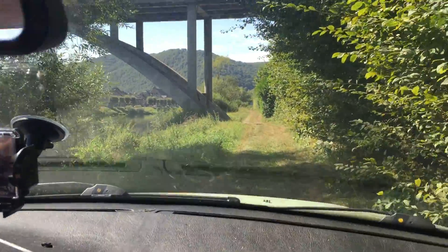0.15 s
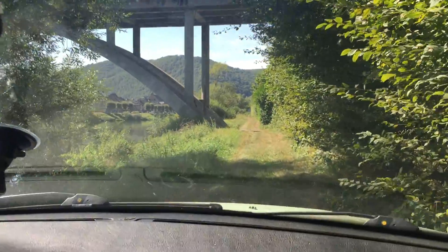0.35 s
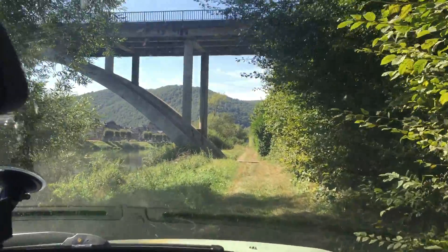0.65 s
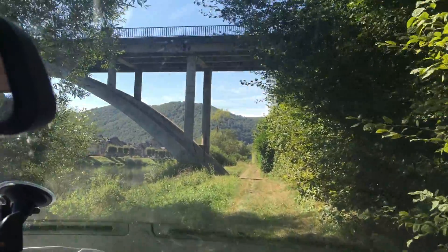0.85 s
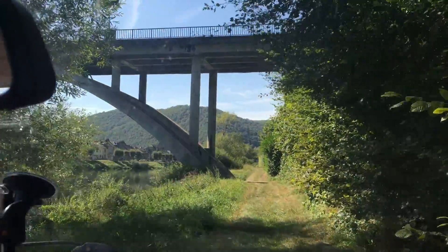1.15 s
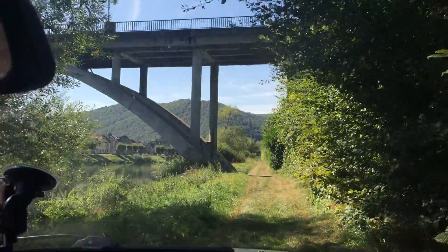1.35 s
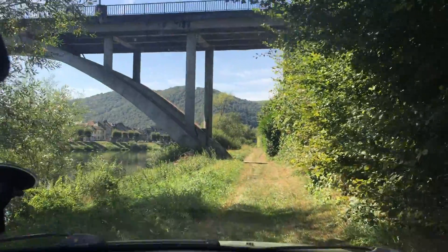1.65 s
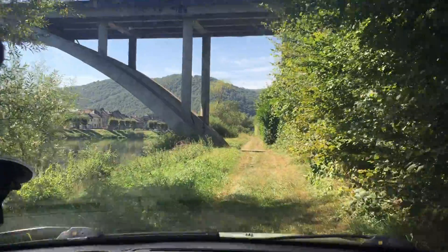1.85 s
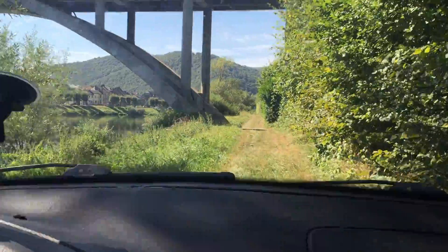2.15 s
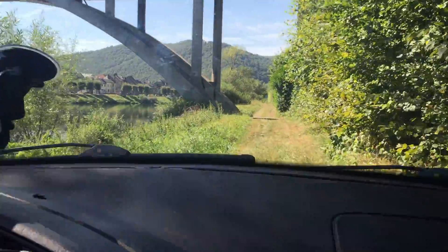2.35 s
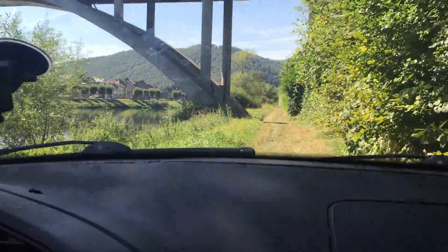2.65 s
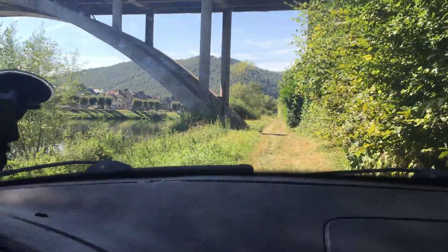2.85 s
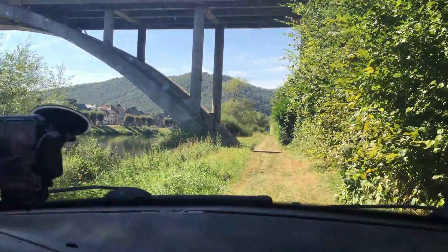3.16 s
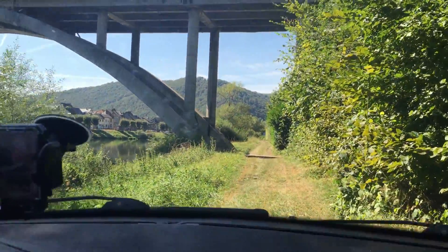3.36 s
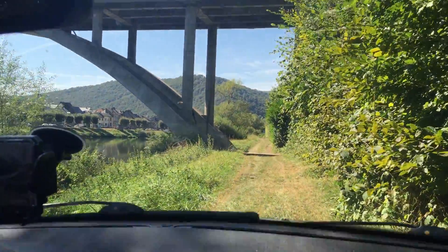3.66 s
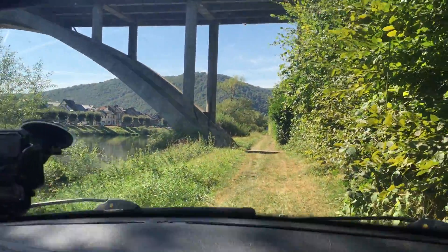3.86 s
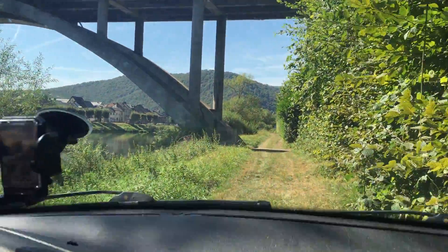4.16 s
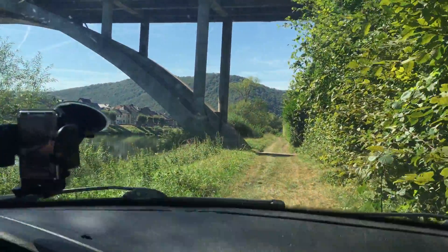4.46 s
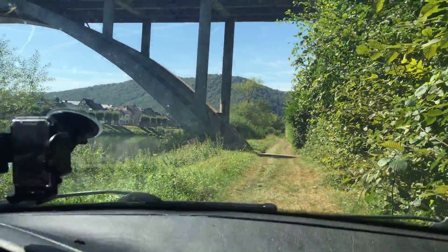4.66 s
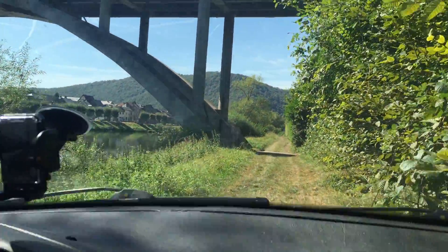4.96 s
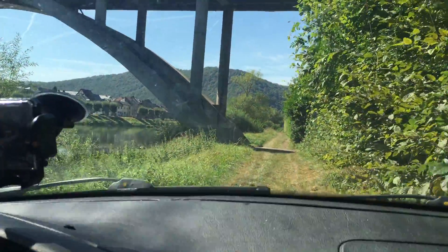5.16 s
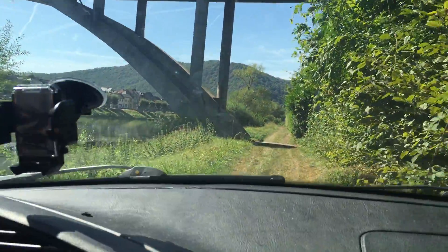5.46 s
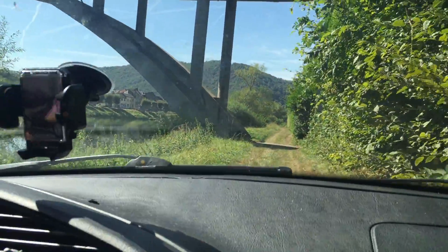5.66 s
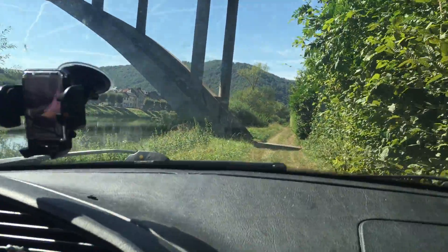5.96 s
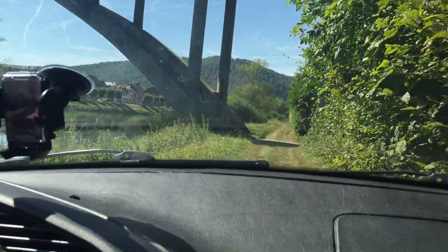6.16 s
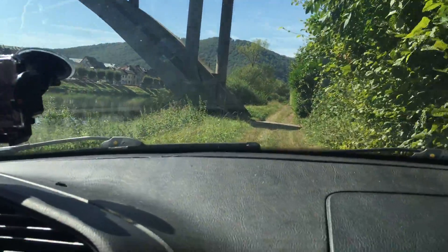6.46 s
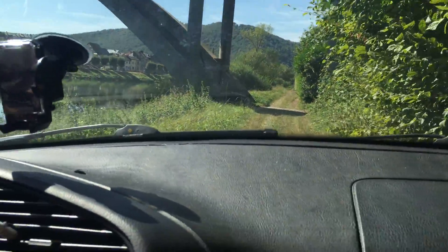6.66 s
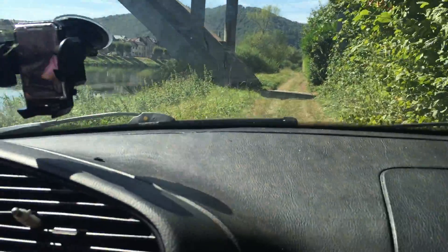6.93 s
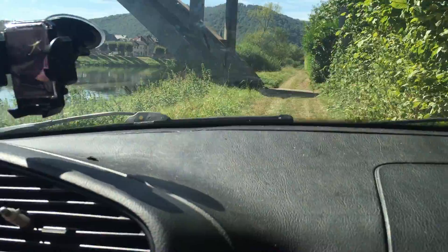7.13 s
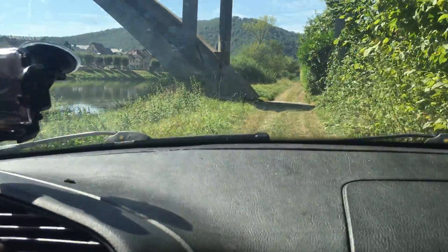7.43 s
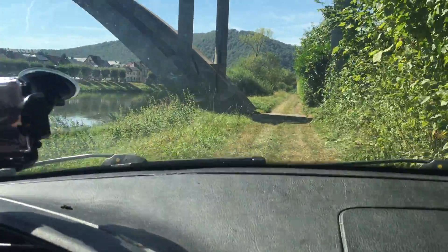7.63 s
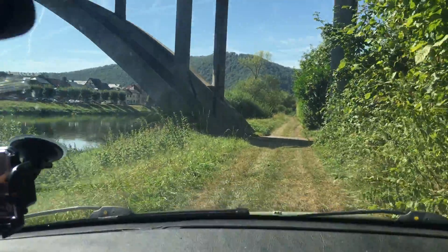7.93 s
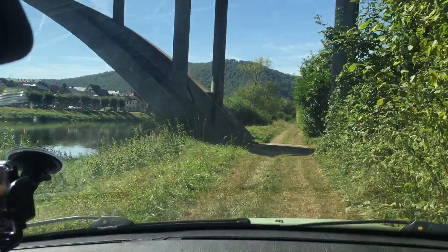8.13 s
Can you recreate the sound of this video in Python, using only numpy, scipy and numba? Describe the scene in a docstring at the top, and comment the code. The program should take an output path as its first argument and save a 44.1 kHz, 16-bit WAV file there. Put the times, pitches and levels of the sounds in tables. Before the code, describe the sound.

A phone in a car cabin picks up a steady low engine drone, rumbling tyres and soft bassy thuds from ruts. Early twig taps are faint; a short patch of brushing and knocks comes after three seconds. From five to seven and a half seconds the hedge drags heavily along the door, leaves hissing, twigs snapping and knocking, a stem squeaking. It ends with quieter rumble, one more thump and a faint cricket outside.

```python
"""First heard is engine hum over low road rumble, with a knock on the door and a rut thumping the air.
A phone held in the cabin of a small car hears it crawl along a rutted grass track beside a hedge.
Engine orders are sines, the road is shaped noise, and ruts ring the cabin modes. On the door panel and
glass, noise through resonances makes leaves brush, twigs scrape and knock, and a stem squeal.
A cricket chirps now and then through the open window: noise pulsed by wing strokes."""
import sys
import numpy as np
from scipy import signal
from scipy.fft import rfft, irfft, next_fast_len
from scipy.io import wavfile
from scipy.ndimage import uniform_filter1d
from numba import njit

SR = 44100
rng = np.random.default_rng(int(sys.argv[2]) if len(sys.argv) > 2 else 0)


def transcribe(u):
    """Save the signal u as a 16-bit wav file named by the first command-line argument.

    u: samples, shape (n,) or (channels, n), limited to [-1, 1]; the rate is SR.
    q: integer samples, one column per channel.
    """
    v = np.clip(np.atleast_2d(u).T, -1, 1)
    q = np.round(v * 32767).astype(np.int16)
    wavfile.write(sys.argv[1], SR, q)


N = 365588
T = np.arange(N) / SR  # s

# Outside, through the open window: cricket chirps. start_s, peak_db, length_ms
CRICKET_CHIRPS = [(1.38, -60, 30), (2.824, -58.5, 68), (2.904, -57, 77), (2.982, -52, 55),
                  (8.129, -59, 15.4), (8.157, -65, 14), (8.198, -50, 22), (8.243, -56, 31)]
CRICKET_HZ, CRICKET_STROKES_HZ = 5700, 73.5

# Under the floor: relative spectrum of the road rumble. frequency_hz, density_db (per Hz)
ROAD_SPECTRUM = [(22, -22), (32, -7), (50, 2), (68, -1), (95, -5), (130, -2), (180, -7.5), (250, -12),
                 (400, -17), (520, -25.5), (750, -25), (1100, -33.5), (1700, -32.5), (2400, -47.5),
                 (4500, -58), (15000, -57.5)]
ROAD_DB, RATTLE_DB = -40, -64.5  # rumble; door trim shaken by the road

# Engine through its run. time_s, firing_rate_hz, first_order_db, higher_order_load_db
ENGINE_CURVE = [(0.0, 47.4, -34.5, -1.5), (0.3, 45.72, -39.5, -1.5), (0.5, 48.27, -70, 1),
                (0.78, 48.07, -36, 2.5), (1.05, 50.25, -32.5, 5.5), (1.3, 51.7, -28.5, 3.5),
                (1.55, 51.63, -30.5, 2), (1.7, 51.85, -31.5, 2), (2.0, 52.97, -25, 3),
                (2.2, 52.58, -26, -7), (2.36, 51.4, -27.5, -2), (2.43, 51.6, -33, -14),
                (2.5, 50.33, -29, -16), (2.58, 49.3, -35, -15), (2.68, 47.9, -33, -14),
                (2.85, 44.9, -36, -14), (3.05, 43.4, -41.5, -17), (3.25, 43.1, -36.5, -4.5),
                (3.5, 40.76, -34, 2), (3.75, 42.5, -38.5, -1.5), (3.95, 44, -38, 0), (4.2, 44.89, -44, 2),
                (4.35, 44.46, -40, -2.5), (4.6, 44.63, -38, 1.5), (4.87, 44.78, -40.5, -3),
                (5.0, 45.57, -44, -1), (5.8, 46.12, -43, 1.5), (6.3, 46.8, -38, 1.5),
                (6.7, 46.26, -44, -0.5), (7.05, 44.97, -41, 0.5), (7.35, 45.1, -45, -0.5),
                (7.6, 45.64, -46, 0), (8.29, 45.29, -39, -2.5)]
# Higher orders; 4.2, 6.3 and 8.4 come from a shaft geared to the crank. turns_per_firing, level_db
ORDER_LEVELS = [(2, -2), (3, -1.46), (4, -7), (4.2, -7), (5, -9.5), (6.001, -12), (6.3, -9), (8.4, -9)]
# Floor and seats boom where an order crosses one of these. frequency_hz, half_width_hz, level_db
BODY_BOOMS = [(84.9, 3.6, -41), (91, 5.1, -50), (104.34, 2.5, -45.5), (124.3, 6.2, -43), (140.3, 6.4, -40),
              (157.5, 3.1, -51), (178.75, 1.9, -35.5), (195.3, 3.1, -48), (217.9, 3.64, -42),
              (230, 3.4, -56.5), (282.6, 5.3, -53), (306.4, 17, -49.5), (348, 14.6, -47.5),
              (392.5, 11.4, -55.5)]
WOBBLE_DB = 0.35  # level flutter, multiplied by the order number

# Air and floor modes of the cabin. frequency_hz, level_db, t60_s
CABIN_MODES = [(55.2, 3.5, 0.5), (68, -1, 0.15), (144, 7.5, 0.22), (175.6, 2.5, 0.64)]
# Wheels dropping into ruts. start_s, peak_db, push_length_ms
RUT_DROPS = [(0.064, -21.5, 11.4), (0.498, -20, 11.7), (2.471, -31, 6.5), (2.618, -20, 19),
             (2.926, -21.5, 2.2), (3.36, -22.5, 7.7), (4.329, -23.5, 8.7), (5.037, -25.5, 9.4),
             (6.299, -58, 8.3), (7.3, -28, 8.1), (7.625, -22, 8.2), (7.752, -25.5, 9.7), (7.881, -26, 6.6),
             (8.138, -26, 6.3)]

# On the glass: leaf tips flicking it. start_s, peak_db
LEAF_TICKS = [(0.44, -45), (0.7477, -45), (0.9144, -57), (1.022, -50), (3.1532, -44.5), (3.33, -41),
              (3.395, -42), (3.495, -49), (3.608, -45), (3.65, -46), (3.72, -50), (3.809, -44), (3.96, -49),
              (4.08, -54), (4.1725, -41), (4.9023, -49), (5.212, -31), (5.39, -31), (5.483, -32),
              (5.572, -34), (6.0397, -34), (6.144, -25.5)]
TICK_MS = 11  # decay time constant
# On the glass: a stem skids. time_s, level_db, pitch_hz
STEM_SQUEAL = [(7.05, -57, 6520), (7.106, -46.5, 6700), (7.21, -43.5, 5840), (7.226, -38.5, 6083),
               (7.306, -35.5, 6220), (7.342, -51, 5930), (7.42, -57, 5900)]

# Modes of the door skin. frequency_hz, width_hz, level_db
DOOR_MODES = [(691, 85, -0.5), (1038, 51, 5), (1385, 160, -7.5), (1528, 77, 3), (1826, 146, -2.5),
              (1920, 620, -6.5), (3080, 330, -11), (3486, 210, -9), (4350, 500, -20), (5340, 130, -20),
              (6620, 600, -10)]
FLEX = 0.02  # share by which the modes move for a shift of 1
# Twigs knocking the door. start_s, peak_db, ring_pitch_hz,
# dull_thud_db (against the whole blow), wide_crack_db (against the ring), contact_ms
TWIG_KNOCKS = [(0.048, -39, 1120, 1, -18, 10), (0.259, -44, 880, 3, 10, 14),
               (0.515, -44.5, 700, -15, -12, 31), (1.007, -44, 945, -12, -21, 21),
               (2.276, -49, 2324, 3, 10, 18.3), (2.388, -48, 1510, -5, -12, 11.7),
               (2.42, -44, 1210, -14, -9, 9.2), (2.434, -32, 1170, -8, -16, 8),
               (2.857, -47, 600, 8, -17, 12), (2.904, -45, 3500, -1, 7, 17),
               (3.018, -27.5, 1570, -29, 12, 5.7), (3.052, -44.5, 1183, 3.5, 4, 15),
               (3.538, -28.5, 1420, -5, 12, 13.9), (3.568, -37, 3266, -10, 3, 6.6),
               (3.58, -29, 3080, -5, -21, 7.6), (3.599, -39, 1580, 2, -3, 9.2),
               (3.618, -40.5, 2845, -3, 5, 7.9), (3.639, -43, 2560, -12, 2, 14),
               (3.688, -41.5, 1100, -17, 1, 17), (3.758, -39.5, 1488, 0, -20, 9.9),
               (3.946, -40, 1530, -22, -15, 13), (4.003, -47, 1592, -22, -1, 11.6),
               (4.168, -39.5, 2940, -4, 2, 13.5), (4.478, -54, 4730, -6, -5, 8.6),
               (4.575, -46, 946, -6, -19, 8), (4.848, -46, 1550, -11, -11, 16.6),
               (4.902, -39, 700, -11, -2.5, 13), (4.922, -37.5, 690, -0.5, -13, 15),
               (5.071, -36, 750, -26, -2, 7.3), (5.088, -36, 710.6, -20, -10, 9.9),
               (5.107, -35.5, 2462, -3, -10, 7), (5.162, -44, 2933, -4, 3, 7),
               (5.247, -41, 719, -20, -6, 12), (5.302, -43, 2202, -23, 2, 10),
               (5.318, -35, 5190, -20, -3, 3.95), (5.322, -42, 720, -20, -7, 8.1),
               (5.446, -35, 2178, -26, 0, 10.4), (5.499, -30, 2680, -24, 2, 8.5),
               (5.521, -36, 2302, -20, 1, 9), (5.539, -35, 2775, -15, -1, 8),
               (5.557, -25, 1310, -7, 12, 9.6), (5.57, -19, 3430, -30, -20, 4.3),
               (5.6, -29, 2980, -20, 1, 11), (5.631, -28, 1882, -3.5, 0, 10.7),
               (5.664, -38, 2200, -15, 7, 5.7), (5.702, -42, 1416, -12, 4, 9.5),
               (5.758, -28.5, 3040, -3, -2, 12), (5.842, -27, 1888, -11, 9, 8.4),
               (5.871, -32, 1714, -2, 7, 9.3), (5.89, -28.5, 1720, -15, 9, 11),
               (5.968, -34, 2450, -21, 2, 8.3), (6.065, -22.5, 2766, -14, 0, 6.9),
               (6.072, -29.5, 915, -21, -6, 8.5), (6.091, -29, 2330, -16, -5, 14),
               (6.127, -22, 1620, -32, 9, 8.8), (6.132, -24.5, 670, -28, -13, 6.7),
               (6.142, -24, 3280, -14, -3, 10.5), (6.16, -34, 4300, -7, -2, 5.3),
               (6.338, -30, 1220, -3.5, -19, 7.1), (6.423, -35, 2070, -7, 8, 11),
               (6.452, -40, 595, 4, -7, 5.3), (6.806, -23, 1720, -8, 19, 10.8),
               (6.815, -23, 2956, -5, -3, 6.7), (6.831, -36.5, 715, 5, -12, 12),
               (6.88, -30.5, 2595, -9, 9, 6), (7.011, -15.5, 1880, -17, 4, 5.8),
               (7.014, -24, 3120, -5.5, -10, 5.2), (7.055, -35.5, 2290, -2, 6, 8),
               (7.323, -35.5, 1955, -20, 0, 6.3), (7.619, -41, 1969, -20, -25, 10.3),
               (7.753, -43, 749, -13, -18, 37), (7.78, -50, 1704, -20, -19, 14),
               (7.871, -46.5, 1242, -22, -20, 18), (7.94, -40, 1560, 4, -23, 9.8),
               (8.142, -50, 1738, -19, -15, 19), (8.187, -44, 1640, 5.5, -25, 15)]
FIRST_STRIKE = 2.4  # size of the first contact against the chatter after it

# How hard the hedge presses on the door. time_s, leaf_brushing_db, twig_dragging_db, twig_pitch_hz
HEDGE_PRESSURE = [(0.0, -69, -65.5, 1760), (1.2, -72, -65, 1770), (1.9, -67.5, -64, 2200),
                  (2.2, -81, -66.5, 2200), (2.75, -79, -74, 2100), (3.12, -69, -62, 2320),
                  (3.25, -57.5, -67, 3060), (3.42, -57, -65, 3044), (3.7, -57.5, -58, 2980),
                  (3.8, -65, -64, 3234), (3.87, -59, -60, 4300), (4.0, -58, -59, 4220),
                  (4.06, -63, -58, 2560), (4.3, -67, -68, 2190), (4.9, -68, -68.5, 2220),
                  (4.98, -54, -53.5, 2960), (5.22, -41.5, -48, 2900), (5.52, -39, -45, 2800),
                  (5.68, -48.5, -51, 2690), (5.94, -47, -55, 2620), (6.45, -43.5, -48.5, 3060),
                  (6.63, -54.5, -66, 3180), (6.76, -50.5, -54.5, 2783), (6.84, -44.5, -49, 2880),
                  (7.3, -44.5, -56.5, 3730), (7.38, -50, -61, 3050), (7.72, -52.5, -65, 2620),
                  (7.83, -65.5, -80, 2080), (8.29, -73, -64.5, 1970)]
# Relative spectrum of the leaf hiss. frequency_hz, density_db (per Hz)
LEAF_SPECTRUM = [(1180, -3.5), (2000, -7.5), (2140, -6), (2690, -7), (3460, -9.5), (4340, -4.5),
                 (5100, -7.5), (6360, -2.5), (8050, -7.5), (9250, -4), (10500, -8.5), (12500, -5.5),
                 (14200, -8.5), (15700, -12)]
# Single sprigs swiping past. start_s, held_ms, leaves_db, twigs_db
SPRIG_SWIPES = [(0.43, 39, -58.5, -70), (0.665, 33, -64, -83), (0.74, 18, -72, -68), (0.905, 39, -61, -63),
                (1.015, 31, -63, -80), (1.38, 26, -69, -75), (1.70, 44, -65, -65), (1.85, 42, -64, -68),
                (3.009, 7.9, -50.5, -71), (3.15, 18, -71, -74), (3.27, 26, -66, -53.5),
                (3.301, 63, -52, -55), (3.46, 37, -58, -58), (3.54, 62, -62, -46), (3.80, 51.4, -50, -59),
                (3.87, 97, -54, -57), (4.03, 28, -57, -53), (4.163, 26.4, -54, -54),
                (4.388, 77, -64.5, -82), (4.95, 120, -49, -67), (5.059, 19, -42, -55), (5.20, 52, -53, -67),
                (5.555, 27, -34.5, -38.5), (5.76, 43, -45, -47), (5.839, 34, -48, -42),
                (5.965, 57, -42.5, -69), (6.035, 60.5, -36.5, -42), (6.124, 74, -37.5, -43.5),
                (6.80, 21, -44, -50), (6.90, 27, -48, -65), (7.005, 5.7, -39, -47), (7.22, 84, -55, -71),
                (7.88, 98, -68, -66), (8.01, 17, -64, -64), (8.09, 13.6, -69, -80)]
SWIPE_ATTACK_S, SWIPE_RELEASE_S = 0.012, 0.019
HARD_DULL_DB = 0.11  # fall of the leaf treble for each dB of harder contact
LEAF_RING_CYCLES = 4

# At the phone: microphone noise ahead of its filters, and the top of its range
HISS_DB, TOP_HZ = -80, 15770


def undb(db):
    """Amplitude factor of a level in dB."""
    return 10 ** (np.asarray(db) / 20)


def unit(x):
    """Signal scaled to an RMS of 1."""
    return x / np.sqrt(np.mean(x ** 2))


def curves(table):
    """Columns of a table joined by straight lines in time."""
    s, *columns = np.transpose(table)
    return [np.interp(T, s, column) for column in columns]


@njit
def svf(x, hz, width):
    """State-variable band-pass with a moving centre, gain 1 there."""
    y, b, l = np.empty(len(x)), 0., 0.
    for i in range(len(x)):
        g, k = np.tan(np.pi * hz[i] / SR), width / hz[i]
        v = (b + g * (x[i] - l)) / (1 + g * (g + k))
        b, l, y[i] = 2 * v - b, l + 2 * g * v, k * v
    return y


def band(x, hz, width):
    """One resonance at a fixed or moving centre, width in Hz."""
    return svf(x, hz + np.zeros(len(x)), float(width))


def walk(rate):
    """Random values held 1 / rate s and slewed twice, with an RMS of 1."""
    k = int(SR / rate)
    steps = np.repeat(rng.standard_normal(N // k + 1), k)
    smooth = uniform_filter1d(uniform_filter1d(steps, k), k)
    return unit(smooth[:N])


def crest(x, ms):
    """Usual peak of a noisy burst whose energy fills ms."""
    return np.sqrt(5 * np.sum(x ** 2) / (max(ms, 1) * SR / 1000))


def add(track, s, piece):
    """Lay a piece into the track from s seconds on."""
    i = int(s * SR)
    track[i:i + len(piece)] += piece[:N - i]


def grains(spread_db, rate):
    """Envelope of tiny contacts of very uneven size."""
    k = int(SR / rate)
    level_db = spread_db * rng.exponential(size=N // k + 1)
    size = np.repeat(undb(level_db), k)[:N]
    return unit(uniform_filter1d(size, k))


def patchy(spectrum, drift_db, drift_rate, grain_db, grain_rate):
    """Noise with a given spectrum; each half octave drifts and crackles on its own."""
    hz, db = np.transpose(spectrum)
    size = next_fast_len(N)
    octave = np.log2(np.arange(size // 2 + 1) * SR / size + 1)
    noise = rfft(rng.standard_normal(size)) * undb(np.interp(octave, np.log2(hz), db))
    out = 0
    for centre in np.arange(np.log2(hz[0]), np.log2(hz[-1]) + .5, .5):
        share = np.clip(1 - 2 * np.abs(octave - centre), 0, 1)
        part = irfft(noise * share, size)[:N]
        drift = undb(drift_db * walk(drift_rate))
        # a grain lasts at least a few cycles
        out = out + part * drift * grains(grain_db, min(grain_rate, 2 ** centre / 4))
    return unit(out)


def crackle(count, low_hz, high_hz, cycles, spread_db):
    """Small dry snaps, each ringing a few cycles at a pitch of its own."""
    out = np.zeros(N)
    for when, pitch, size in rng.random((count, 3)):
        hz = low_hz * (high_hz / low_hz) ** pitch
        t = T[:int(4 * cycles / hz * SR)]
        strength = undb(-spread_db * np.log(1 - .97 * size))
        snap = np.sin(2 * np.pi * hz * t) * np.exp(-t * hz / cycles)
        add(out, when * N / SR, strength * snap)
    return unit(out)


def panel(x, shift):
    """The door skin rings in its modes, which shift a little as it flexes."""
    out = 0
    for k, (hz, width, db) in enumerate(DOOR_MODES):
        out = out + (-1) ** k * undb(db) * band(x, hz * (1 + FLEX * shift), width)
    return out


def cricket():
    """Wing strokes, as pulses of noise, ring a short high resonance."""
    out, t = np.zeros(N), T[:SR // 8]
    for s, db, ms in CRICKET_CHIRPS:
        noise = rng.standard_normal(len(t))
        fade = np.clip((ms / 1000 - t) / 0.01, 0, 1)
        strokes = (1.9 + np.cos(np.pi * CRICKET_STROKES_HZ * t) ** 4) * fade
        note = band(band(noise * strokes, CRICKET_HZ, 420), CRICKET_HZ, 420)
        add(out, s, undb(db) * note / np.abs(note).max())
    return out


def road():
    """Tyres and suspension rumble over grass and gravel and shake the door trim."""
    rumble = patchy(ROAD_SPECTRUM, drift_db=1.1, drift_rate=4, grain_db=1.4, grain_rate=90)
    shake = band(grains(1.6, 120) * rng.standard_normal(N), 1000, 1100)
    rattle = undb(2.5 * walk(6)) * unit(panel(shake, walk(4)))
    return undb(ROAD_DB) * rumble + undb(RATTLE_DB) * rattle


def body(hz):
    """Gain of the floor and seats at a frequency: a sum of resonance peaks."""
    return sum(undb(db) / (1 + ((hz - centre) / width) ** 2) for centre, width, db in BODY_BOOMS)


def engine():
    """The first order has its own level; higher orders follow load and swell at body resonances."""
    hz, first_db, load_db = curves(ENGINE_CURVE)
    turn = 2 * np.pi * np.cumsum(hz * (1 + 0.0012 * walk(8))) / SR
    lines = [(1, undb(first_db))]
    for order, db in ORDER_LEVELS:
        lines.append((order, undb(db + load_db) * body(order * hz)))
    out = np.zeros(N)
    for order, size in lines:
        flutter = undb(WOBBLE_DB * order * walk(6))
        tone = np.sin(order * turn + rng.uniform(0, 2 * np.pi))
        out += np.sqrt(2) * size * flutter * tone  # sqrt(2): levels are RMS
    return out


def ruts():
    """A soft push through the suspension rings the cabin; a shorter push reaches higher modes."""
    out, t = np.zeros(N), T[:SR // 2]
    ring = np.zeros(len(t))
    for hz, db, t60 in CABIN_MODES:
        ring += undb(db) * np.exp(-np.log(1000) * t / t60) * np.sin(2 * np.pi * hz * t)
    for s, db, ms in RUT_DROPS:
        push = np.hanning(int(max(ms, 1) * SR / 1000))
        thump = signal.fftconvolve(ring, push)
        add(out, s, undb(db) * thump / np.abs(thump).max())
    return out


def ticks():
    """Leaf tips flick the glass: thin, bright bursts of noise."""
    out, t = np.zeros(N), T[:SR // 16]
    for s, db in LEAF_TICKS:
        burst = rng.standard_normal(len(t)) * (1 - np.exp(-t / 0.001)) * np.exp(-t * 1000 / TICK_MS)
        flick = band(burst, 11300, 9700)
        add(out, s, undb(db) * flick / np.abs(flick).max())
    return out


def squeal():
    """Stick and slip: rough noise through a wandering resonance and fixed ones beside it."""
    db, hz = curves(STEM_SQUEAL)
    slip = grains(1.64, 300) * rng.standard_normal(N)
    rings = band(slip, hz * (1 + 0.066 * walk(40)), 700)
    rings = rings + 0.34 * band(slip, 5200, 296.0) + 0.29 * band(slip, 7600, 1500)
    touching = (T > STEM_SQUEAL[0][0]) & (T < STEM_SQUEAL[-1][0])
    return undb(db) * unit(rings) * touching


def knocks():
    """Each knock is a chatter of contacts: a pitched ring, a wide crack in the skin, a thud through the door."""
    out, t = np.zeros(N), T[:SR // 10]
    trim = signal.butter(3, 4800, fs=SR, output="sos")  # the door lining dulls the top
    for s, db, hz, thud_db, crack_db, ms in TWIG_KNOCKS:
        noise = rng.standard_normal(len(t))
        decay = np.exp(-(t * 1000 / max(ms, 1)) ** 1.05)
        chatter = noise * (1 - np.exp(-t / 0.00079)) * decay
        chatter[0] = FIRST_STRIKE
        ring = band(band(chatter, hz, 0.18 * hz), hz, 0.35 * hz)
        wide = band(chatter, 1680, 2250)
        skin = panel(wide, noise[-1])  # one random mode shift per knock
        crack = signal.sosfilt(trim, skin + 0.67 * wide) + 0.039 * chatter
        blow = unit(ring) + undb(crack_db) * unit(crack)
        add(out, s, undb(db) * blow / crest(blow, ms))
        thud = band(band(chatter, 374, 330), 374, 330)
        add(out, s + 0.00288, undb(db + thud_db) * thud / crest(thud, ms + 6))
    return out


def swipes():
    """Leaf and twig power of the sprigs: quick attack, hold, dying release."""
    out, t = np.zeros((2, N)), T[:SR // 2]
    for s, ms, leaves_db, twigs_db in SPRIG_SWIPES:
        attack = np.clip(t / SWIPE_ATTACK_S, 0, 1)
        after_hold = np.maximum(t - SWIPE_ATTACK_S - ms / 1000, 0)
        shape = attack * np.exp(-after_hold / SWIPE_RELEASE_S)
        add(out[0], s, (undb(leaves_db) * shape) ** 2)
        add(out[1], s, (undb(twigs_db) * shape) ** 2)
    return out


def hedge():
    """Leaves hiss and crackle along the paint; twigs drag in coarser grains, ring the door and snap."""
    leaves_db, twigs_db, twigs_hz = curves(HEDGE_PRESSURE)
    leaf_power, twig_power = swipes() + undb([leaves_db, twigs_db]) ** 2

    hiss = patchy(LEAF_SPECTRUM, drift_db=2.8, drift_rate=16, grain_db=2.1, grain_rate=260)
    leaf_snaps = crackle(4000, low_hz=3800, high_hz=13770, cycles=LEAF_RING_CYCLES, spread_db=3.6)
    leaves = hiss * undb(0.35 * walk(40)) + undb(-8) * leaf_snaps
    # harder contact dulls the treble, contact below -79 dB brightens it
    top_gain = undb(-HARD_DULL_DB * (10 * np.log10(leaf_power) + 79))
    leaves = leaves + (top_gain - 1) * band(leaves, 7200, 12000)

    drag = panel(grains(2.0, 350) * rng.standard_normal(N), walk(5))
    scrape = band(band(drag, twigs_hz, 1950), twigs_hz, 2050) + 0.26 * drag
    twig_snaps = crackle(5000, low_hz=1500, high_hz=5500, cycles=3, spread_db=3.3)
    lining = unit(band(band(drag, 440, 360), 440, 360))  # the door lining drums along
    twigs = unit(scrape) * undb(2.0 * walk(30)) + undb(-4) * twig_snaps + undb(-4.0) * lining

    judder = undb(0.5 * walk(25))  # the whole bough shakes as it drags
    return judder * (np.sqrt(leaf_power) * leaves + np.sqrt(twig_power) * twigs)


def scene():
    """Cricket, road, engine and ruts, with the door and glass sounds in a short cabin tail."""
    door = ticks() + squeal() + knocks() + hedge()
    # the small padded cabin adds a short dense tail, t60 0.11 s
    t = T[:SR // 6]
    tail = rng.standard_normal(len(t)) * np.exp(-np.log(1000) * t / 0.11)
    tail = tail / np.sqrt(np.sum(tail ** 2))
    door = door + undb(-13) * signal.fftconvolve(door, tail)[:N]
    return (cricket() + road() + engine() + ruts() + door)[None]


def record(dry):
    """The phone adds its hiss and cuts the deepest bass and the top."""
    dry = dry + undb(HISS_DB) * rng.standard_normal(N)
    dry = signal.sosfilt(signal.butter(5, 39, "high", fs=SR, output="sos"), dry)
    return signal.sosfilt(signal.ellip(14, .2, 60, TOP_HZ, fs=SR, output="sos"), dry)


dry = scene()
out = record(dry)
transcribe(out)
```